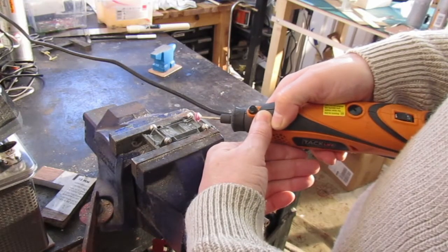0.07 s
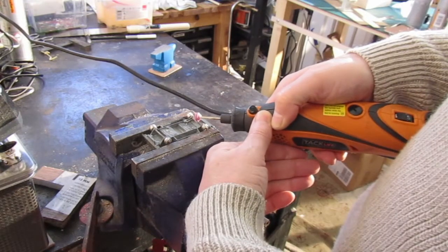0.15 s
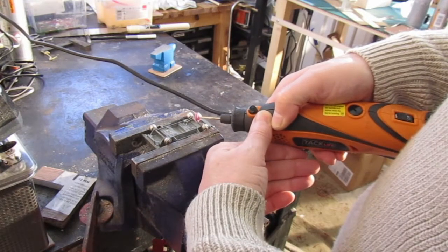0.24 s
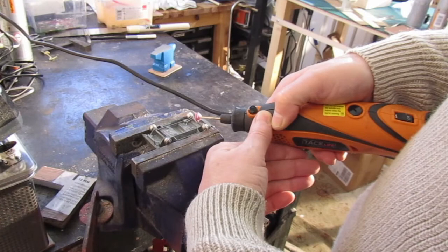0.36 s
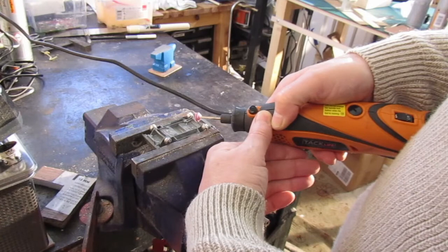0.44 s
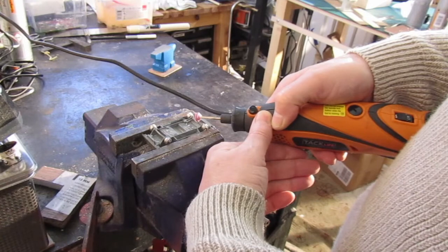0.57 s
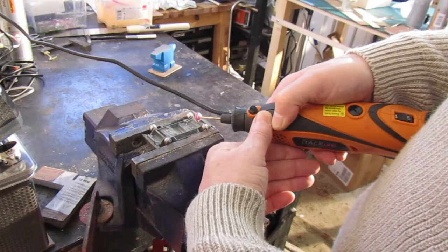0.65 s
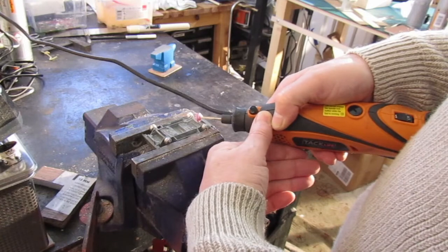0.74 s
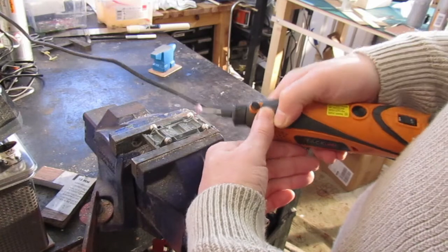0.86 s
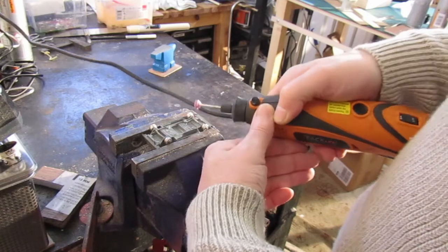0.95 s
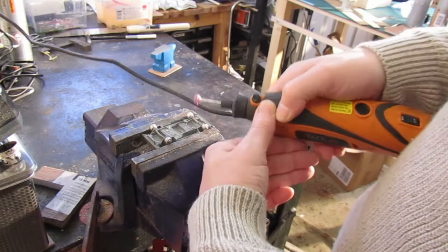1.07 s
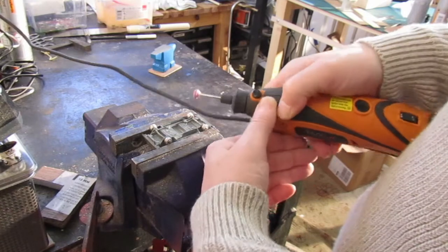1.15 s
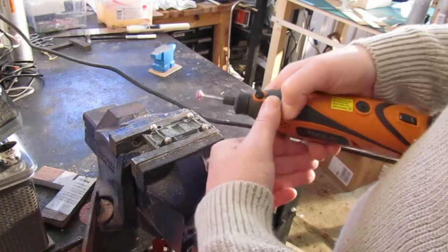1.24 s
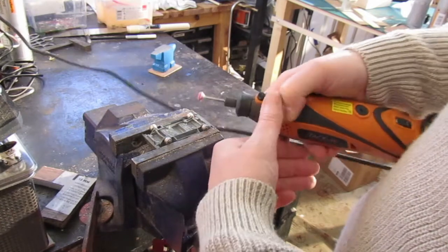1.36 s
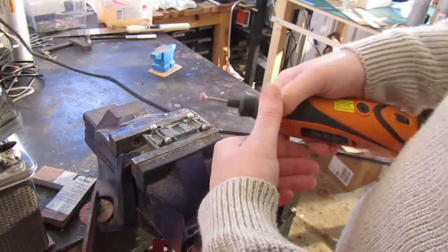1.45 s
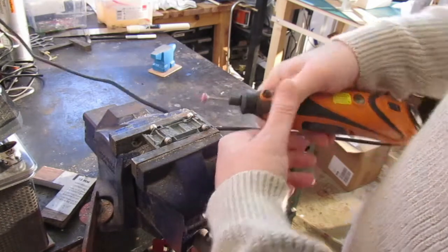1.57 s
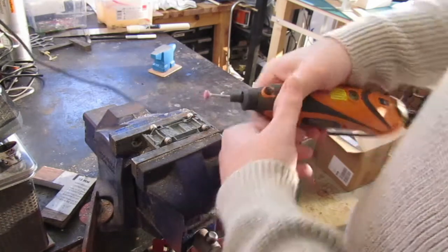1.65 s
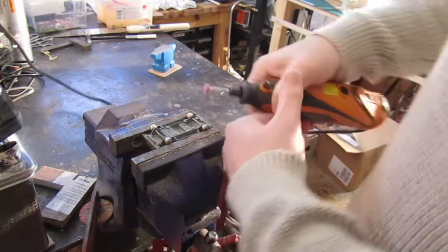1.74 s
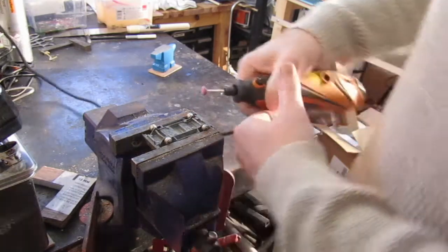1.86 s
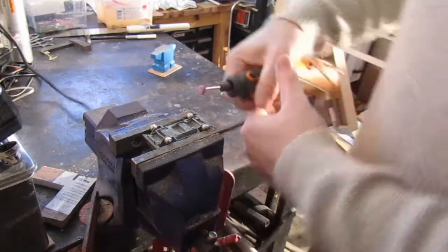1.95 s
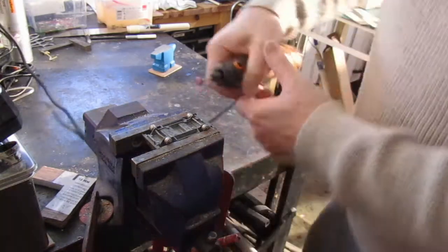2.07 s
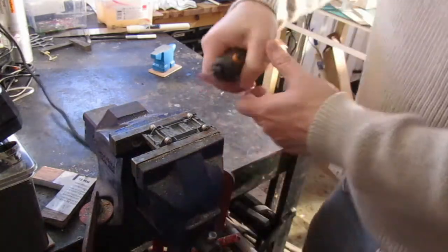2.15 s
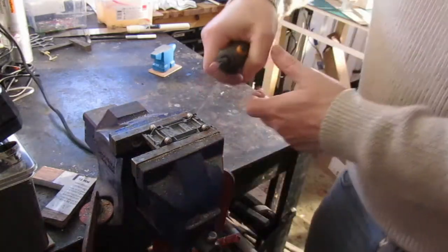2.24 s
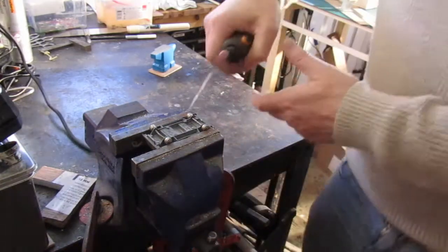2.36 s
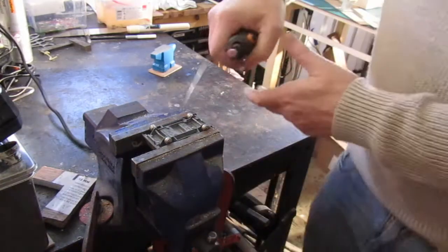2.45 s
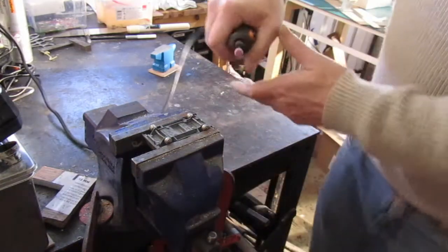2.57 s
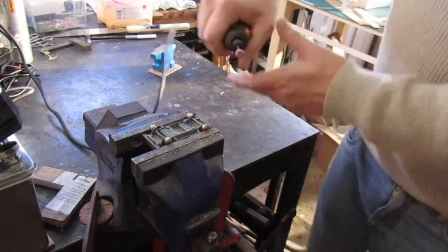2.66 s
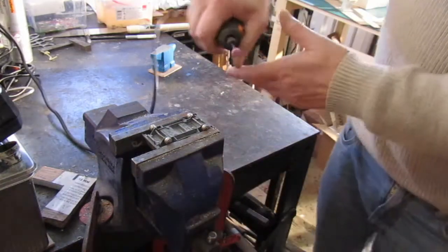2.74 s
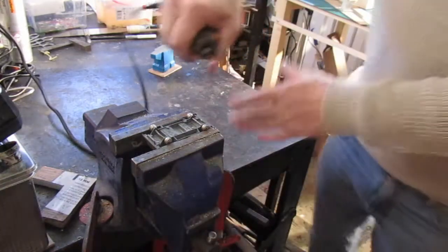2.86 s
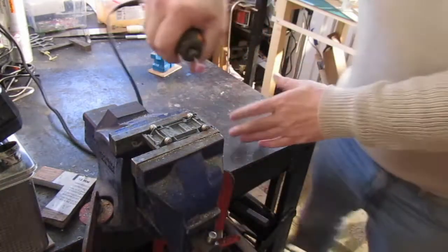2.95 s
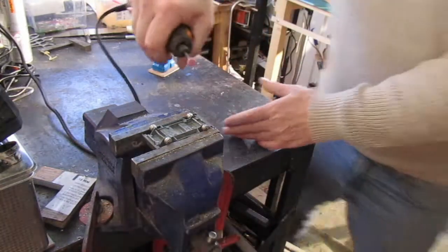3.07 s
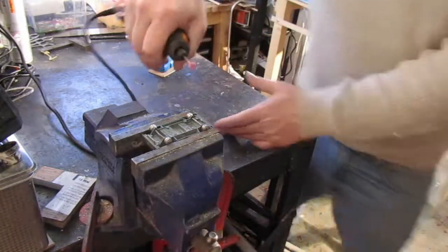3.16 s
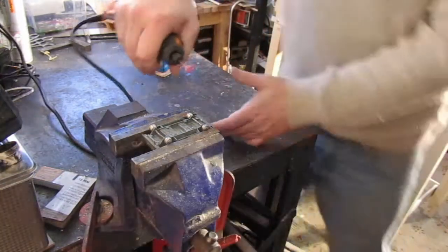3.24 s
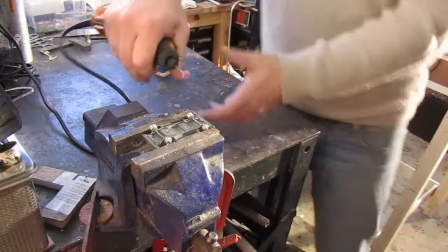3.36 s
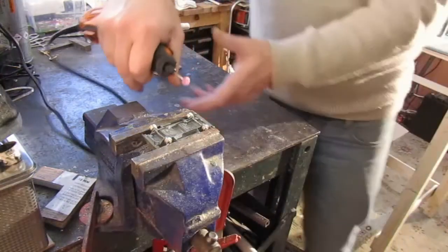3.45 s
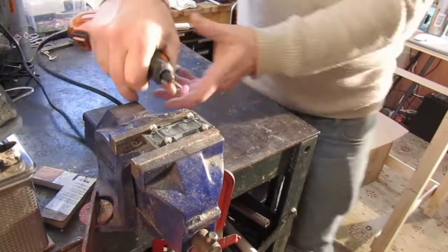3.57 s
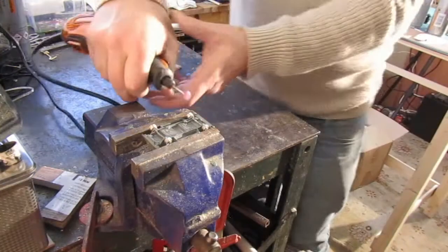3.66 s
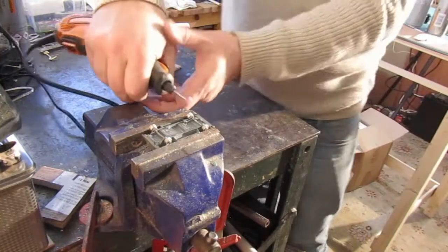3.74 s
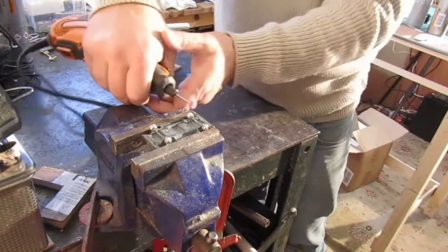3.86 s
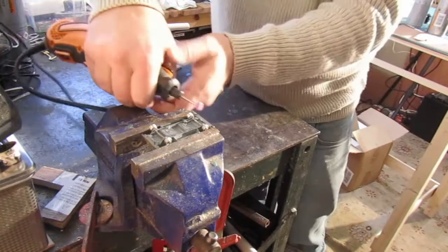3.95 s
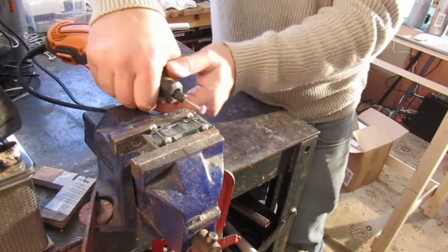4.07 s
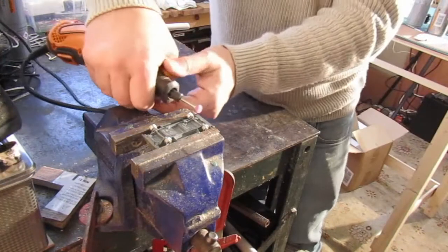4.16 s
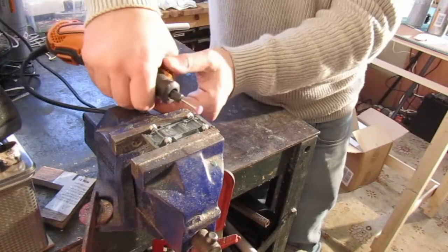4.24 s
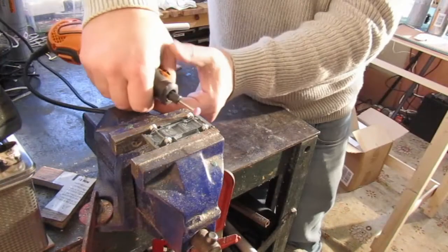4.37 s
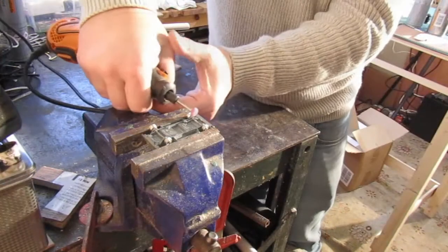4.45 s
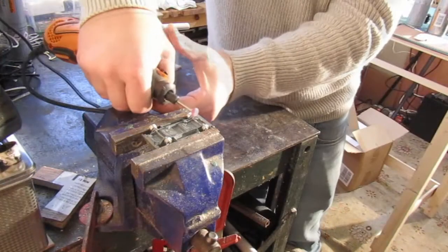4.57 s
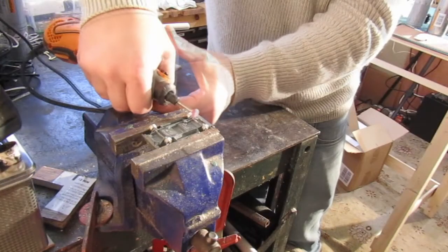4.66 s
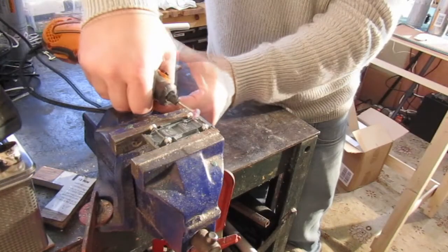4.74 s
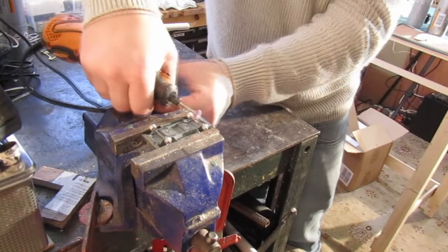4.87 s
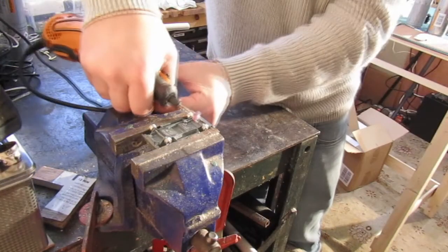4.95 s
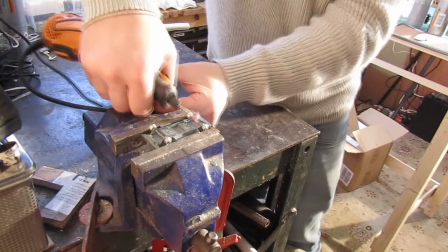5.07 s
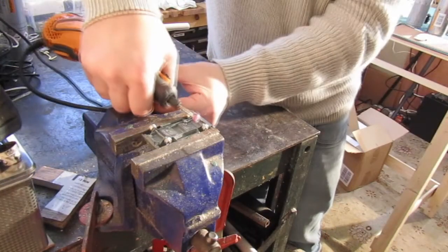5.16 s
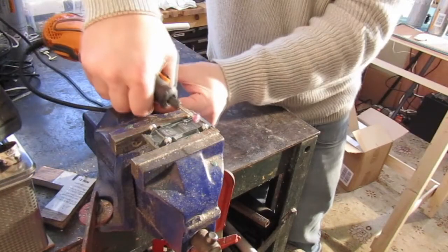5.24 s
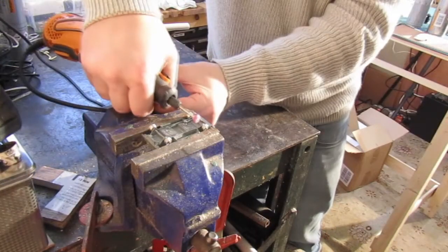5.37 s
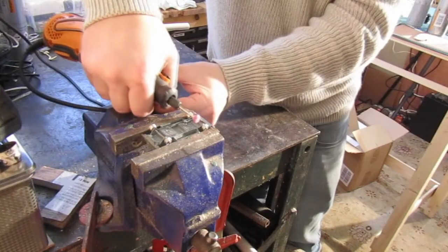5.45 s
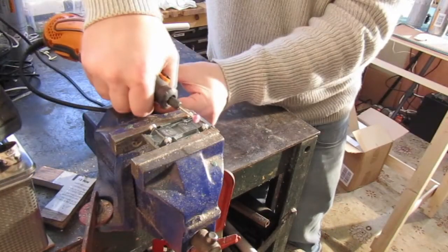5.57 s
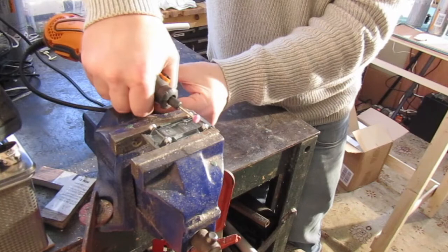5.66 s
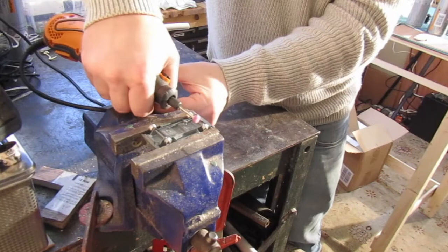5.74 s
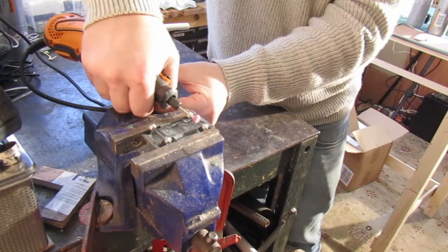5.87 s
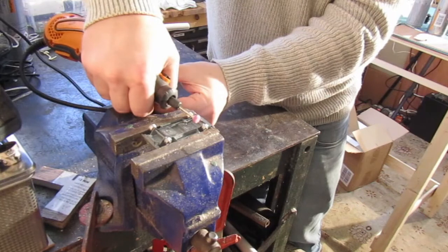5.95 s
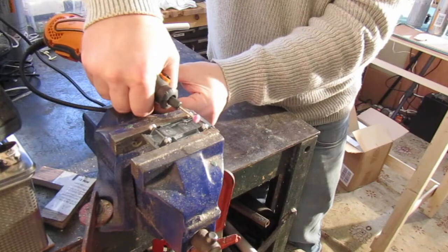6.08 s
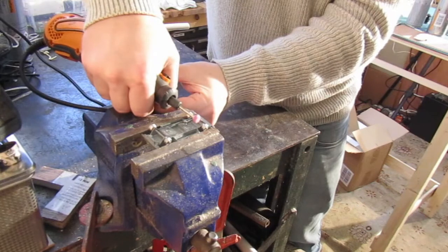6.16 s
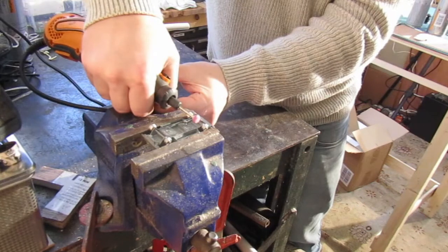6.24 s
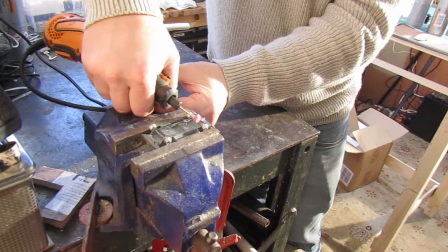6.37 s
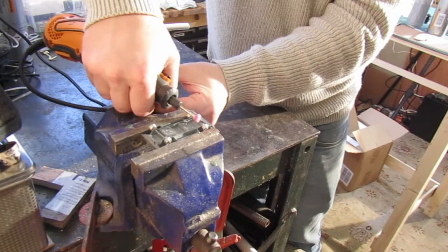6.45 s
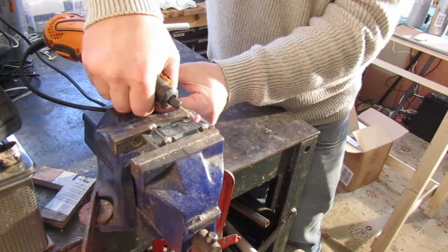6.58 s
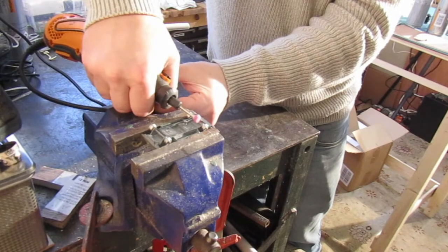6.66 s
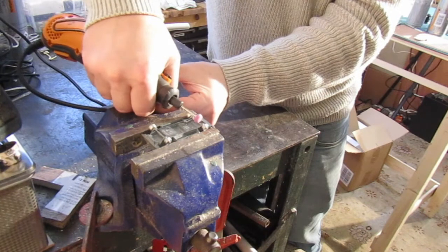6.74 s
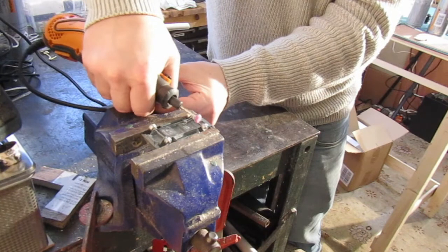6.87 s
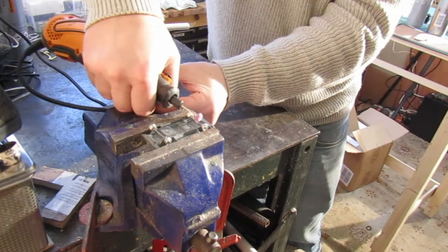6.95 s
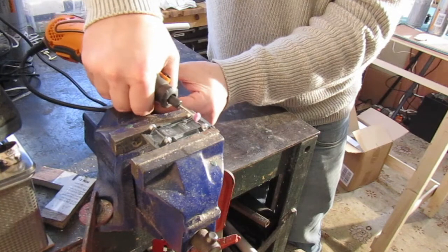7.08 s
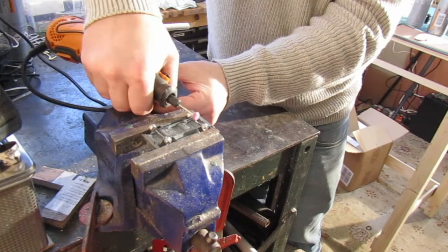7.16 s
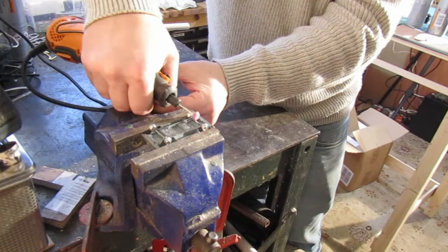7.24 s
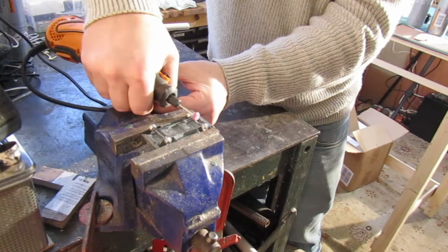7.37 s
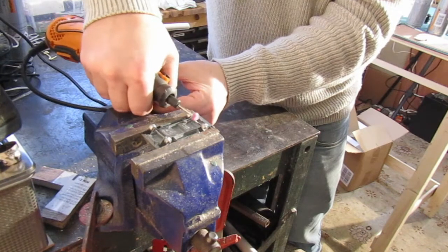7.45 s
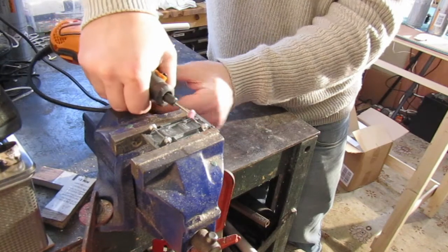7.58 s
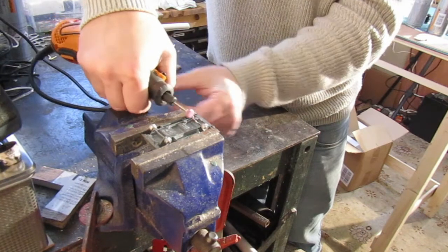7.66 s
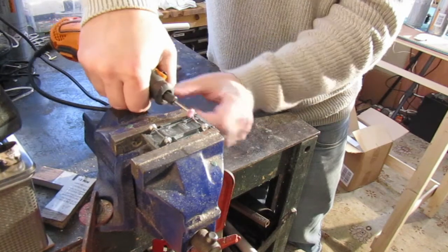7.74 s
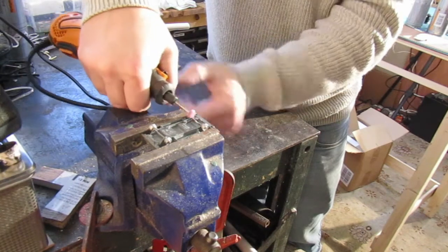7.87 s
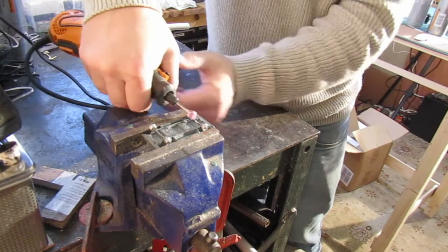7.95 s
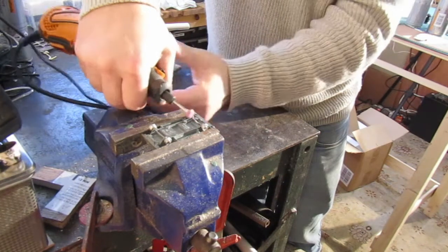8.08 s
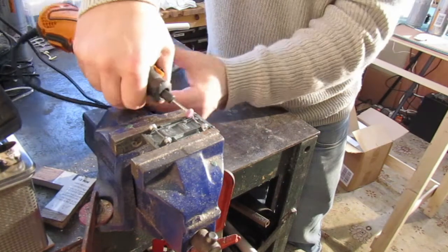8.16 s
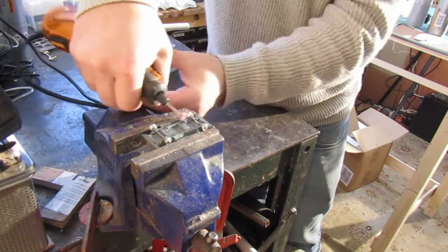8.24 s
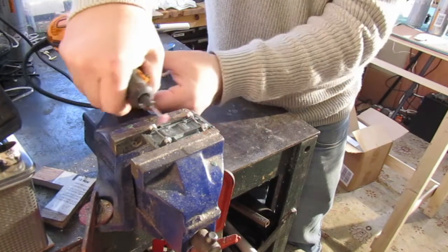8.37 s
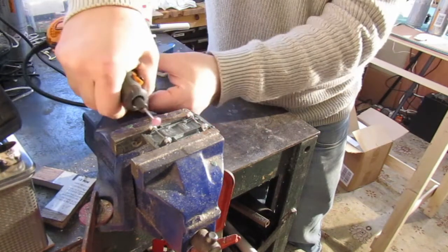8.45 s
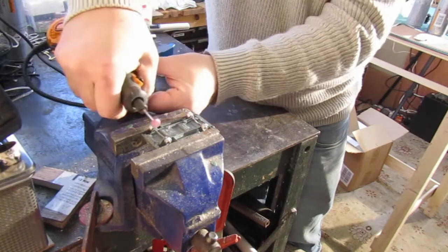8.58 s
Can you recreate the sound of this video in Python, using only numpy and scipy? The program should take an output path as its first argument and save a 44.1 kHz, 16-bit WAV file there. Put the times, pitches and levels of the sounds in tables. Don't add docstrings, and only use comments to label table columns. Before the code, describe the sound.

A gritty, buzzing stone tears at steel, making the vice jaws and thin axle ring. It skids off and the motor speeds up into a whirring fan whine that slowly grows louder over several seconds, with a faint floor scuff and a hollow box knock. A hard biting contact follows, then an abrupt change to another uneven grinding pass, and finally free spinning, quieter then swelling. Close and dry, indoors.

```python
import sys
import numpy as np
from scipy import signal
from scipy.fft import rfft, irfft, next_fast_len
from scipy.io import wavfile
from scipy.ndimage import uniform_filter1d, map_coordinates

SR = 44100
rng = np.random.default_rng(int(sys.argv[2]) if len(sys.argv) > 2 else 0)


def dump(signal):
    limited = np.clip(np.atleast_2d(signal).T, -1, 1)
    pcm = np.round(limited * 32767).astype(np.int16)
    wavfile.write(sys.argv[1], SR, pcm)


def level_to_linear(level):
    exponent = np.asarray(level, float) / 20
    return 10 ** exponent


N = 379701
CUT_S = 5.853
BALL_PASS = 2.553
FIRM_DB = -25.5
JAW_HZ = 1855

# t/s, grit level/dB
GRIND = [
    [(0, -22.5), (.104, -21.5), (.32, -24), (.436, -22.5), (.7, -24), (.762, -21), (.802, -21.5),
     (.876, -44), (1.03, -51)],
    [(5.44, -37), (5.5, -28), (5.52, -24.5), (5.662, -33), (5.784, -22), (5.85, -21.5)],
    [(5.858, -29), (5.878, -26), (6.096, -25), (6.33, -28.5), (6.435, -33.5), (6.58, -28), (6.7, -29.5),
     (6.79, -46.5), (6.842, -24.5), (6.88, -51)],
]


def unit(x):
    return x / np.sqrt(np.mean(x ** 2) + 1e-20)


def curves(rows):
    s, *cols = np.transpose(rows)
    return [np.interp(np.arange(N) / SR, s, c) for c in cols]


def spans(tables):
    rows = []
    for table in tables:
        before = (table[0][0] - .004, -110)
        after = (table[-1][0] + .004, -110)
        rows += [before, *table, after]
    return curves(rows)[0]


def wobble(rate):
    knots = rng.standard_normal(int(N * rate / SR) + 4)
    return map_coordinates(knots, [np.arange(N) * rate / SR], order=1)


def filtered(x, response):
    m = next_fast_len(N + 8192)
    return irfft(rfft(x, m) * response(np.fft.rfftfreq(m, 1 / SR)), m)[..., :N]


def coloured(x, points):
    f, db = np.transpose(points)
    return unit(filtered(x, lambda hz: level_to_linear(np.interp(np.log(hz + 1), np.log(f), db))))


def ringing(x, modes):
    def response(f):
        total = 0
        for k, (centre, width, db) in enumerate(modes):
            damping = 1j * f * width
            total = total + (-1) ** k * level_to_linear(db) * damping / (centre * centre - f * f + damping)
        return total
    return filtered(x, response)


def patchy(depth_db):
    z = signal.stft(rng.standard_normal(N), nperseg=256)[2]
    field = uniform_filter1d(rng.standard_normal(z.shape), 4, 0)
    field = uniform_filter1d(field, 12, 1)
    return signal.istft(z * level_to_linear(depth_db * unit(field)), nperseg=256)[1][:N]


def bursts(events, rise):
    env, t = np.zeros(N + SR), np.arange(SR // 2) / SR
    for s, db, t60 in events:
        env[round(s * SR):][:len(t)] += level_to_linear(db - 60 * t / abs(t60)) * (1 - np.exp(-t / rise))
    return env[:N]


def orders(angle, table, drift_db, pace=4):
    total = 0
    for multiple, db in table:
        level = level_to_linear(db + drift_db * wobble(pace))
        total = total + level * np.sqrt(2) * np.sin(multiple * angle + rng.uniform(0, 2 * np.pi))
    return total


def moving_orders(angle, multiples, levels_db, drift_db, pace):
    return sum(level_to_linear(db) * orders(angle, [(k, 0)], drift_db, pace) for k, db in zip(multiples, levels_db))


def shaft():
    # t/s, shaft turns f/Hz
    aim_hz = [
        [(0, 307.9), (.32, 310.4), (.76, 264.2), (.91, 419.7), (1.19, 408.1), (2.63, 421.7), (3.1, 416.2),
         (3.79, 413.3), (3.85, 417.3), (5.37, 419), (5.853, 372.4)],
        [(5.854, 330.3), (6.35, 310.5), (6.45, 338.5), (6.64, 326.3), (6.86, 420.3), (7.87, 426.7),
         (8.61, 422.2)],
    ]
    start_hz, inertia_s = (321, 341), .45
    keep = np.exp(-1 / (inertia_s * SR))
    parts = np.split(curves(sum(aim_hz, []))[0], [round(CUT_S * SR)])
    speeds = []
    for aim, hz in zip(parts, start_hz):
        speeds.append(signal.lfilter([1 - keep], [1, -keep], aim, zi=[keep * hz])[0])
    return np.concatenate(speeds)


def airflow(beat):
    # f/Hz, level/dB per Hz
    slot_spectrum = [(150, -17.5), (400, -5.5), (650, -21), (880, -3), (1200, 3), (1700, 1.5), (2300, 1),
                     (3300, 2), (4100, 1.5), (5200, 1), (8600, -1.5), (11000, -6), (13000, -23),
                     (14600, -17), (15300, -120)]
    # t/s, share of the middle band removed
    hand_shade = [(0, 0.42), (.85, 0.8), (1.3, 0.36), (1.8, 0.35), (2.3, .05), (3.5, 0.093), (5.4, 0.16),
                  (6.9, 0.059), (8.61, .02)]
    # f/Hz, width/Hz, level/dB
    shaded_band = [(1550, 1300, 0)]
    # f/Hz, width/Hz, level/dB
    shroud_modes = [(5355, 42, 5), (5370, 50, -2), (7900, 120, -20), (8720, 180, -3.5)]
    # f/Hz, width/Hz, level/dB
    handle_modes = [(590, 110, 0), (700, 80, -3)]
    # t/s, level/dB against the fan air
    cupped_db = [(0, -12), (.9, -11), (1.3, -5.5), (2.3, -10.5), (2.7, -14.5), (3.6, -16.5), (4.3, -19),
                 (5.4, -16), (6.9, -16), (8.61, -18)]
    # t/s, level/dB against the fan air
    facing_db = [(0, -28), (1.9, -22), (2.15, -6), (2.9, -4.5), (3.2, -13.5), (8.61, -14)]
    # f/Hz, level/dB per Hz
    jet_spectrum = [(8000, -42), (10000, 3), (11500, 1), (12600, -9), (14000, -17), (15200, -120)]
    air = coloured(beat * patchy(depth_db=1.0), slot_spectrum) * level_to_linear(4.5)
    air -= np.clip(curves(hand_shade)[0], 0, 1) * ringing(air, shaded_band)
    air += level_to_linear(-9.5) * unit(ringing(beat * patchy(depth_db=4.0), shroud_modes))
    air += level_to_linear(curves(cupped_db)[0]) * unit(ringing(beat * patchy(depth_db=1.5), handle_modes))
    air += level_to_linear(curves(facing_db)[0]) * coloured(beat * patchy(depth_db=2.0), jet_spectrum)
    return air


def fine_lines(angle, minor_db):
    # multiple, level/dB against the fan air
    shaft_orders = [(3, -13), (5, -15), (6, -21), (7, -20)]
    # ball passes, shaft turns added, level/dB against the fan air
    ball_lines = [(2, 0, -12), (-1, 8, -17), (2, 1, -20), (3, -1, -18), (3, 1, -19), (3, 2, -17),
                  (1, 3, -20)]
    # multiple, level/dB against the fan air
    high_orders = [(9, -18), (10, -18), (11, -20), (11.77, -17), (12, -14), (12.23, -17), (12.77, -15),
                   (13, -13), (13.22, -17), (13.78, -18), (14, -14), (15.78, -16), (16.23, -16),
                   (17, -13), (19, -15), (20, -20), (22, -18), (24, -16), (25, -22), (27, -20),
                   (28, -25), (29, -22), (30, -24), (31, -24), (32, -27), (35, -28), (36, -29)]
    # t/s, level/dB of four race lines against the fan air
    grip_db = [(0, -25, -22, -24, -25), (1.2, -28, -19, -22, -27), (1.9, -28, -12.5, -19, -21),
               (2.6, -13, -10.5, -13, -15), (3.2, -6, -9, -19, -17), (3.7, -15, -17, -10.5, -18),
               (4.1, -41, -11, -13, -14), (5.4, -34, -10, -13, -16), (5.9, -27, -20, -18, -25),
               (6.8, -30, -22, -17, -23), (7.1, -23, -24, -24, -19), (7.6, -18, -18, -18, -15),
               (8, -18, -12, -3.5, -6), (8.61, -16, -11, -7.5, -8)]
    # t/s, level/dB of lower sideband, commutator, upper sideband
    brush_db = [(0, 3, 12, 6), (.35, 2, 11, 7), (.55, -10, 4, 5), (.75, -9, -3, -10), (.93, -4, 3, -5),
                (1.1, 0, 0, -4), (1.25, -2, 1, -6), (1.6, -5, -6, -12), (2.2, -8, -5, -18),
                (2.75, -13, -11, -15), (3.4, -15, -3, -13), (4.1, -16, -5, -18), (4.8, -18, -16, -14),
                (5.3, -18, -8, -19), (5.7, -16, -11, -20), (6, -4, 0, -10), (6.4, -10, 3, -8),
                (6.8, -6, -3, -14), (7.1, -8, -9, -11), (7.6, -12, -9, -13), (8.15, -15, -5, -24),
                (8.61, -22, -17, -22)]
    # t/s, level/dB of blade lines 15, 16, 18 against the fan air
    blade_db = [(0, 4, 4, -1), (.6, 0, -1, -4), (.8, -12, -8, -14), (.95, -11, -5, -10), (1.2, -15, -9, -9),
                (1.4, -11, -8, -13), (1.65, -11, -9, -3), (2.15, -11, -5, -5), (2.45, -6, -8, -5),
                (2.75, -7, -4, -3), (3.1, -9, -6, 3), (3.45, -9, -6, -2), (4.05, -6, -6, -3),
                (4.35, -5, -4, -1), (4.65, -7, -1, -3), (4.95, -5, -8, -10), (5.3, -10, -19, -12),
                (5.7, -8, -14, -5), (6, -12, -7, -7), (6.4, -3, -4, -10), (6.8, -7, -14, -15),
                (7, -16, -10, -7), (7.15, -9, -6, -5), (7.3, -9, -7, -10), (7.85, -8, -7, -1),
                (8.15, -14, -9, -5), (8.45, -12, -7, 5), (8.61, -12, -7, 5)]
    commutator = (7.74, 8, 8.25)
    blades = (15, 16, 18)
    races = (BALL_PASS, BALL_PASS + 1, 4, BALL_PASS + 2)
    balls = [(passes * BALL_PASS + turns, db) for passes, turns, db in ball_lines]
    lines = orders(angle, high_orders, drift_db=3.5, pace=5)
    lines += moving_orders(angle, races, curves(grip_db), drift_db=2, pace=10)
    minor = orders(angle, shaft_orders, drift_db=3.5, pace=3) + orders(angle, balls, drift_db=3.5, pace=4)
    lines += level_to_linear(2 + minor_db) * minor
    levels = curves(brush_db) + curves(blade_db)
    lines += moving_orders(angle, commutator + blades, levels, drift_db=2, pace=25)
    return lines


def main_lines(angle, first_db, second_db, ball_db, third_db):
    push_drift_db = 3 * np.clip(spans(GRIND) - FIRM_DB + 10, 0, 10) / 10
    lines = level_to_linear(first_db) * orders(angle, [(1, 0)], drift_db=.7, pace=12)
    lines += level_to_linear(second_db) * orders(angle, [(2, 0)], drift_db=1.3 + push_drift_db, pace=45)
    lines += level_to_linear(ball_db) * orders(angle, [(BALL_PASS, 0)], drift_db=2.5, pace=8.6)
    lines += level_to_linear(third_db) * orders(angle, [(3, 0)], drift_db=1.5, pace=20)
    return lines


def motor(turns_hz, angle, air_db, casing_db):
    # t/s, level/dB of unbalance, of second order, against the fan air
    hold_db = [(0, -12.5, 2), (.6, -9, 6), (.755, -6, 14.5), (.79, -1, -7), (.92, -17.5, -12),
               (1.3, -7.5, 0.5), (1.7, -1.5, -11.5), (2.45, -8.5, -11), (3.0, -3, -3.5), (3.55, -6, -4),
               (4.0, 0.5, -17), (4.45, -1, -1.5), (5.46, 0.5, -2), (5.5, -2, -9), (6.1, -2, -8),
               (6.4, -18, -18), (7.0, -11.5, -16), (7.3, -0.5, -2), (7.7, -1.5, -10.5), (8.1, -3, 3.5),
               (8.61, -6.5, -3)]
    # shaft f/Hz, level/dB of bearing, of third order, change/dB of minor lines
    housing_db = [(295, -15, -4, -10), (308, -4, 4, -10), (313, -3, -8, -10), (318, -2, -14, -10),
                  (327, -8, -25, -8), (343, 1, -25, -7), (365, -1, -25, -5), (380, -6, -20, -4),
                  (395, -17, -18, -2), (412, -14, -25, -1), (418, -15, -25, 0)]
    # f/Hz, width/Hz, level/dB
    casing_modes = [(790, 128, -3), (894.3, 31, 6.5), (1085, 24, -1.5)]
    first, second = curves(hold_db)
    speeds, *passed = np.transpose(housing_db)
    ball, third, minor = (np.interp(turns_hz, speeds, db) + 1.5 * wobble(4) for db in passed)
    third = third + np.clip(spans(GRIND) - FIRM_DB, -40, 0)
    beat = 1 + .08 * np.cos(angle)
    air = airflow(beat) + fine_lines(angle, minor)
    casing = level_to_linear(air_db + casing_db - 4.0) * unit(ringing(beat * patchy(depth_db=1.7), casing_modes))
    lines = main_lines(angle, air_db + first, air_db + second, air_db + ball, air_db + third)
    return level_to_linear(air_db) * air + casing + lines


def ring_gain(grains, modes):
    return 1 / np.std(ringing(unit(grains), modes))


def grit_hiss(scratch):
    # f/Hz, level/dB per Hz
    grit_spectrum = [(150, -31), (280, -14), (450, -18), (580, -11), (1300, -6), (2250, -7), (2600, -3),
                     (3050, -8), (3500, -6), (4800, -2), (6200, -7), (7000, -2), (9600, -8), (11500, -11),
                     (13000, -16), (14850, -24), (15150, -120)]
    return coloured(scratch, grit_spectrum) * np.sqrt(np.mean(scratch ** 2)) * level_to_linear(3.5)


def vice_drone(scratch, blows, grains, drone_db):
    # f/Hz, width/Hz, level/dB
    body_modes = [(585, 25, 0), (625, 45, -3), (810, 35, -8), (915, 45, -6), (2400, 200, -15),
                  (3050, 400, -12), (3540, 70, -10), (3890, 100, -11)]
    drive = level_to_linear(drone_db) * (1.13 * scratch + 0.68 * blows)
    return ringing(drive, body_modes) * ring_gain(grains, body_modes) * level_to_linear(-1.0)


def jaws_and_slide(scratch, blows, grains, jaw_db, loose_db, tight_db):
    # f/Hz, width/Hz, level/dB
    jaw_modes = [(1100, 26, 0), (1580, 33, 7), (1855.5, 38, 17.5), (1961, 27, 6.5), (2630, 40, -38)]
    # f/Hz, width/Hz, level/dB
    slide_modes = [(1230, 48, 0), (1298, 36, 0)]
    # t/s, peak level/dB, t60/s
    skids = [
        (.6, -19, 0.32),
        (.76, -8.5, 0.17),
    ]
    # f/Hz, width/Hz, level/dB
    shank_modes = [(1455, 130, 17), (1580, 60, -1), (1755, 66, 16)]
    flutter = level_to_linear(1.6 * wobble(70))
    jaw_drive = level_to_linear(jaw_db) * flutter * (0.71 * scratch + 0.98 * blows)
    rings = ringing(jaw_drive, jaw_modes) * ring_gain(grains, jaw_modes) * level_to_linear(1.0)
    slide_drive = flutter * (0.26 * scratch + 0.25 * blows)
    for db, mode in zip((loose_db, tight_db), slide_modes):
        rings += ringing(level_to_linear(db) * slide_drive, [mode]) * ring_gain(grains, [mode])
    return rings + ringing(bursts(skids, rise=0.018) * unit(grains), shank_modes)


def axle_sing(scratch, grains, sing_db):
    # f/Hz, width/Hz, level/dB
    axle_modes = [(4000, 70, -0.5), (4330, 65, 5.5), (4280, 75, -3), (5540, 32, 5), (5830, 37, 1.5),
                  (6940, 390, 8), (8620, 350, 2.5), (10160, 210, 5.5), (11030, 250, -4.5),
                  (12320, 36, 11.5), (14330, 170, -2)]
    # f/Hz, width/Hz, level/dB
    tip_modes = [(4700, 70, 5), (4790, 50, 7), (4930, 70, 6), (5120, 90, -1)]
    gain = ring_gain(grains, axle_modes)
    sing = ringing(level_to_linear(sing_db) * scratch, axle_modes) * gain * level_to_linear(5.5)
    for mode in tip_modes:
        sing += ringing(level_to_linear(sing_db + 4.2 * wobble(14)) * scratch, [mode]) * gain * level_to_linear(-1.5)
    return sing


def stone(angle):
    # t/s, peak level/dB, t60/s
    catches = [(0.8874, -27, 0.19), (0.9911, -31, 0.27), (1.0385, -10, 0.052), (5.4635, 1, 0.06),
               (5.5157, -8.5, 0.076), (5.6087, 5, 0.018), (5.6637, -11, 0.12), (5.745, -19, 0.049),
               (5.7724, -3, 0.044), (6.108, -16, 0.046), (6.2048, -4, 0.039), (6.2614, -13, 0.066),
               (6.555, -13, 0.04), (6.573, -18, 0.065), (6.6444, -7.5, 0.039), (6.7116, -11, 0.064),
               (6.7494, -22, 0.063), (6.7794, -20, 0.082), (6.8304, -21, 0.072)]
    # t/s, level/dB of vice drone, tight slide, loose slide, jaws, axle
    bearing_db = [
        [(0, -6, -15, -37, -4, -3), (.45, -7, 2.5, -23, -9, -1), (.6, -7, -20, -14, -9.5, -1.5),
         (.75, -0.5, -23, -23, 0, 0), (.78, -12, -14, -12, -6, -7.5), (.9, -14, -28, -19, -7, -2.5)],
        [(5.44, -14, -8, 3, -5, -5), (5.55, -14, 1, -4.5, 3.5, -1), (5.7, -14, 6, 1, 2, -2),
         (5.85, -17, 3, -3, -0.5, -1.5)],
        [(5.86, -25, -19, 12, 2, 1.5), (6.0, -19, -5, 8, 4, 1), (6.07, -23, 2, -5, 3, 0.5),
         (6.27, -9, 1, 5, 5.5, 0), (6.4, -14, 5.5, -19, -0.5, -0.5), (6.65, -10, 1, -2, -0.5, -1),
         (6.8, -26, -10, 5, 4, -1), (6.9, -22, -3, 1, -1, -11)],
    ]
    damping, wander_db = 0.13, (0.84, 0.51, 3.4, 0.56, 0.2)
    grit_db = spans(GRIND)
    slack_db = damping * np.clip(FIRM_DB - grit_db, -10, 10)
    drone_db, tight_db, loose_db, jaw_db, sing_db = (
        db + slack_db + wander * wobble(25) for db, wander in zip(curves(sum(bearing_db, [])), wander_db))

    steady_push = level_to_linear(grit_db + 0.96 * wobble(30) + 0.38 * wobble(75))
    push = np.hypot(steady_push, level_to_linear(-8.5) * bursts(catches, rise=0.0062))
    bite = np.exp(.5 * np.cos(angle))
    grains = rng.standard_normal(N) * level_to_linear(1.5 * rng.exponential(size=N))
    scratch = push * unit(grains * bite)
    turn = np.diff(np.floor((angle + 0.11 * wobble(150)) / (2 * np.pi)), prepend=0)
    blows = push * unit(turn * level_to_linear(1.6 * rng.standard_normal(N)))

    contact = grit_hiss(scratch) + vice_drone(scratch, blows, grains, drone_db)
    contact += jaws_and_slide(scratch, blows, grains, jaw_db, loose_db, tight_db)
    contact += axle_sing(scratch, grains, sing_db)
    return filtered(contact, lambda hz: 1 / (1 + (200 / (hz + 1)) ** 4))


def room_tone(room_db):
    # f/Hz, level/dB per Hz
    rumble_spectrum = [(20, -25), (45, 3.5), (100, -27), (250, 7), (500, 6), (1000, -120)]
    # f/Hz, level/dB against the rumble
    far_hum = [(479, 7), (576, 6)]
    t = np.arange(N) / SR
    hum = sum(level_to_linear(db + 3 * wobble(4.3)) * np.sin(2 * np.pi * hz * t) for hz, db in far_hum)
    return level_to_linear(room_db) * (hum + level_to_linear(9.5) * coloured(patchy(depth_db=3.5), rumble_spectrum))


def chatter():
    # t/s, peak level/dB
    jaw_knocks = [(0.0593, -25), (0.166, -28), (0.1925, -28), (0.2204, -25), (0.2848, -33), (0.3077, -26),
                  (0.4718, -15), (0.5362, -20), (0.5746, -26), (0.5975, -17), (0.634, -23), (0.6539, -18),
                  (0.7243, -23), (0.7662, -19), (5.4688, -27), (5.5247, -32), (5.5386, -20), (5.588, -24),
                  (5.6539, -27), (5.6713, -23), (5.7132, -22), (5.7307, -16), (5.7671, -13), (5.8115, -22),
                  (5.8365, -14), (5.8674, -31), (5.8943, -25), (5.9317, -19), (6.0235, -25), (6.0475, -22),
                  (6.1063, -21), (6.1492, -25), (6.243, -15), (6.264, -10), (6.3897, -29), (6.4501, -25),
                  (6.5319, -26), (6.5548, -17.5), (6.6257, -23), (6.6731, -25), (6.7125, -30),
                  (6.7499, -21), (6.7793, -23), (6.8327, -38)]
    # t/s, peak level/dB, f/Hz
    slide_knocks = [(5.4668, -22, 1300), (5.52, -16, 1266), (5.5721, -16, 1280), (5.612, -25, 1250),
                    (5.662, -21, 1250), (5.7117, -25, 1230), (5.7432, -17, 1220), (5.83, -19, 1210),
                    (5.8681, -16, 1214), (5.9253, -20, 1230), (5.9454, -16, 1204), (5.965, -26, 1180),
                    (6.0245, -22, 1170), (6.0939, -29, 1340), (6.2057, -15, 1288), (6.3049, -30, 1300),
                    (6.5546, -18, 1170), (6.574, -21, 1320), (6.6446, -17, 1323), (6.6651, -25, 1290),
                    (6.8227, -31, 1350), (6.8397, -28, 1280)]
    hits = [(s, db + 6.5, JAW_HZ, .06) for s, db in jaw_knocks]
    hits += [(s, db + 1.5, hz, .062) for s, db, hz in slide_knocks]
    out, t = np.zeros(N + SR), np.arange(SR // 4) / SR
    for (s, db, hz, t60), (detune, phase) in zip(hits, rng.standard_normal((len(hits), 2))):
        envelope = level_to_linear(db - 60 * t / t60) * (1 - np.exp(-t / 0.0027))
        tone = np.sin(2 * np.pi * hz * (1 + 0.013 * detune) * t + 2 * phase)
        out[round(s * SR):][:len(t)] += envelope * tone
    return out[:N]


def graze():
    # t/s, peak level/dB
    touches = [
        (.87, -38),
        (.905, -32),
        (.935, -48),
        (.965, -33),
        (1.005, -33),
        (1.037, -19),
    ]
    t = np.arange(N) / SR
    envelope = bursts([(s, db, 0.14) for s, db in touches], rise=0.0021)
    return envelope * np.sin(2 * np.pi * JAW_HZ * t + .7 * wobble(60))


def shoes():
    # t/s, peak level/dB, swell and fade/dB per s
    scuffs = [
        (2.58, -53, 200),
        (2.635, -42, 250),
        (2.7, -34.5, 183),
        (2.77, -46, 200),
        (4.256, -39, 400),
    ]
    # f/Hz, level/dB per Hz
    sole_spectrum = [(40, -14), (150, 1), (300, 6.5), (700, 3), (1100, 5), (1500, -21), (2500, -120)]
    t = np.arange(N) / SR
    envelope = sum(level_to_linear(db - fade * np.abs(t - s)) for s, db, fade in scuffs)
    return envelope * level_to_linear(1.3 * wobble(40.6)) * coloured(rng.standard_normal(N), sole_spectrum)


def box_bump():
    # t/s, peak level/dB, t60/s
    bumps = [
        (3.164, -7.5, 0.079),
        (3.172, -13, 0.069),
        (3.186, -14, 0.057),
        (3.196, -14.5, 0.044),
        (3.219, -20, 0.04),
        (3.232, -23, 0.064),
    ]
    # f/Hz, width/Hz, level/dB
    box_modes = [(74, 14, -26), (178, 74, -21.5), (256, 17, -5.5), (335, 23, 0.5), (399, 58, -2),
                 (580, 110, -17), (870, 170, -16), (1430, 150, -21), (1910, 310, -22)]
    pushes = bursts([(s, db, 0.006) for s, db, _ in bumps], rise=0.00077)
    rattle = 0.6 * rng.standard_normal(N) * bursts(bumps, rise=0.0015)
    return ringing(pushes + rattle, box_modes) * level_to_linear(24.0)


def scene():
    # t/s, fan air level/dB, casing level/dB against it
    mic_gain_db = [(0, -40, -12), (.62, -36.5, 6), (.85, -41.5, -7), (1.2, -41.5, 4), (2.3, -40, -8),
                   (2.85, -38.5, -3), (3.55, -33, -5), (3.85, -33, -2), (5.2, -27, 0), (5.466, -26, -1),
                   (5.478, -35.5, 9), (5.6, -35.5, 1.5), (5.9, -38.5, 3), (6.75, -34.5, -9),
                   (6.92, -44, -4), (7.35, -42, -1.5), (8.61, -35, -2)]
    port_lag = (8.28, 7.35)
    turns_hz = shaft()
    angle = 2 * np.pi * np.cumsum(turns_hz * (1 + .0005 * wobble(40))) / SR
    air_db, casing_db = curves(mic_gain_db)
    room_db = air_db - 30 + 0.13 * (air_db + 34.5)
    left = motor(turns_hz, angle, air_db, casing_db) + stone(angle)
    left += room_tone(room_db) + chatter() + graze() + shoes() + box_bump()
    before, after = (filtered(left, lambda hz: np.exp(-2j * np.pi * hz * lag / SR)) for lag in port_lag)
    right = np.where(np.arange(N) < CUT_S * SR, before, after)
    return np.array([left, right])


def band_limit(x):
    return signal.sosfilt(signal.butter(12, 15650, fs=SR, output="sos"), x)


def record(dry):
    fade = np.clip(np.abs(np.arange(N) / SR - CUT_S) / 0.012, .08, 1)
    clipped = dry / (1 + np.abs(dry / .95) ** 4) ** .25
    mix = filtered(fade * clipped, lambda hz: hz < 15100)
    return band_limit(mix)


dry = scene()
out = record(dry)
dump(out)
```